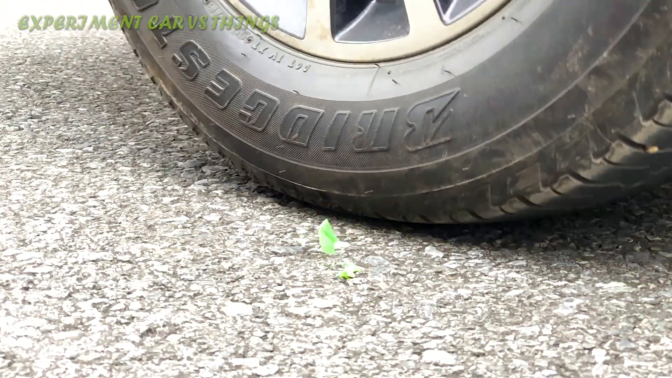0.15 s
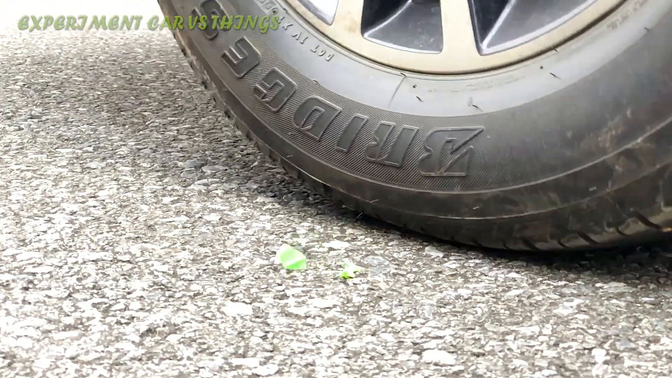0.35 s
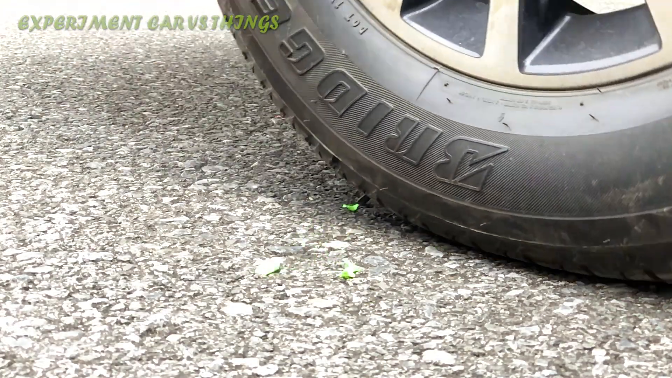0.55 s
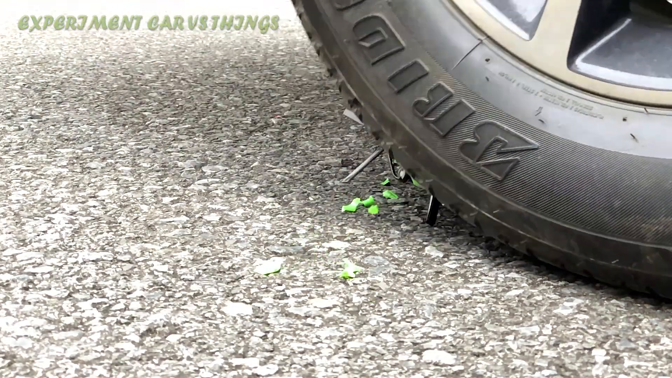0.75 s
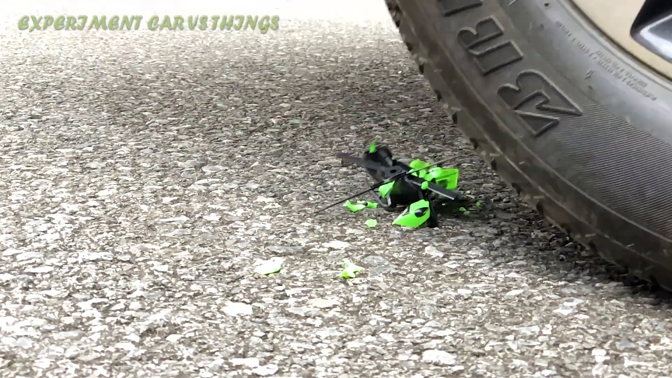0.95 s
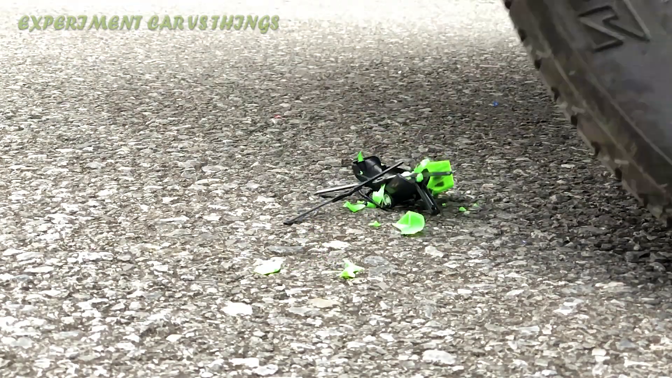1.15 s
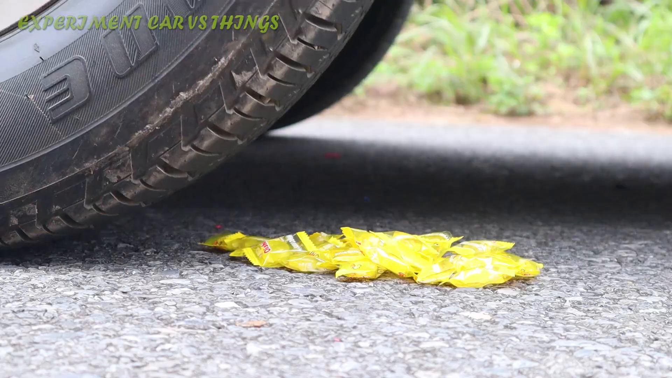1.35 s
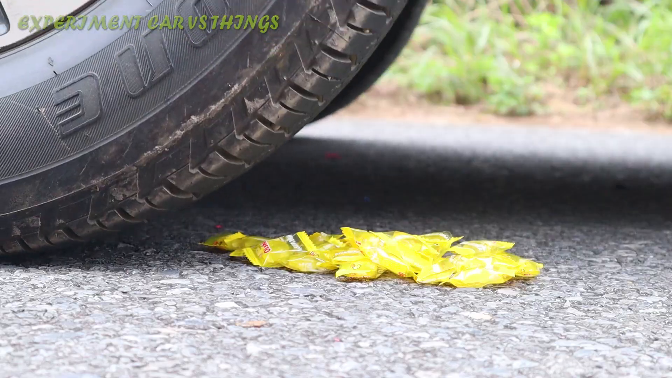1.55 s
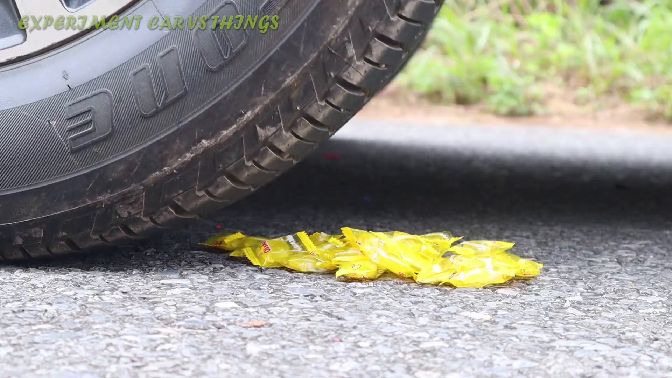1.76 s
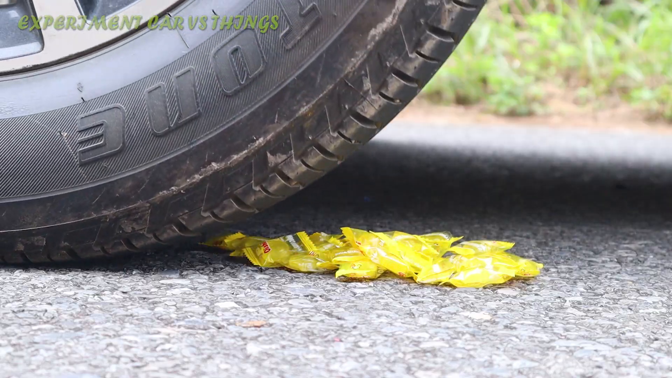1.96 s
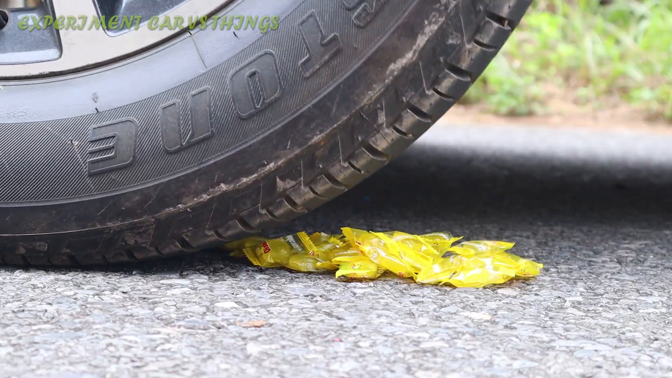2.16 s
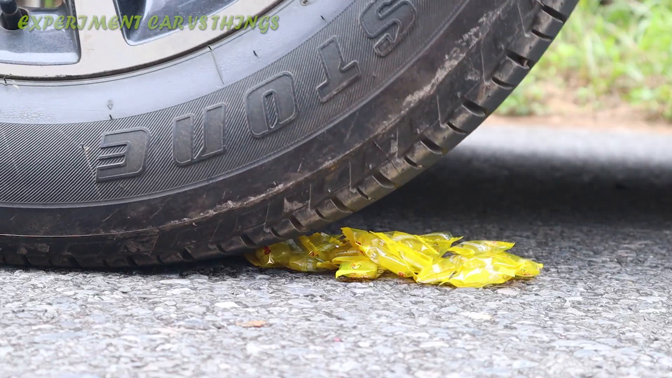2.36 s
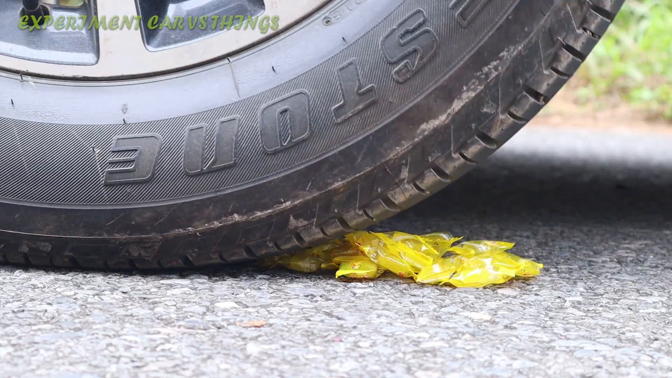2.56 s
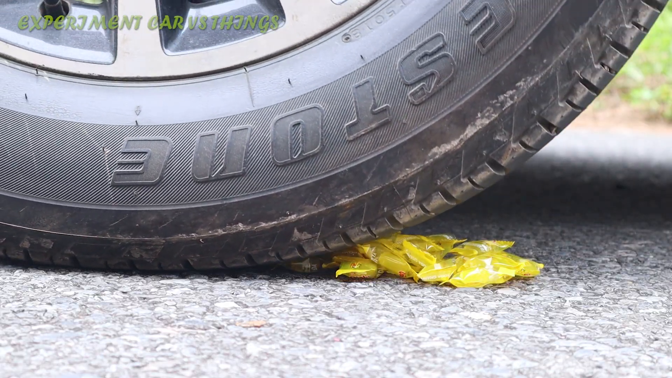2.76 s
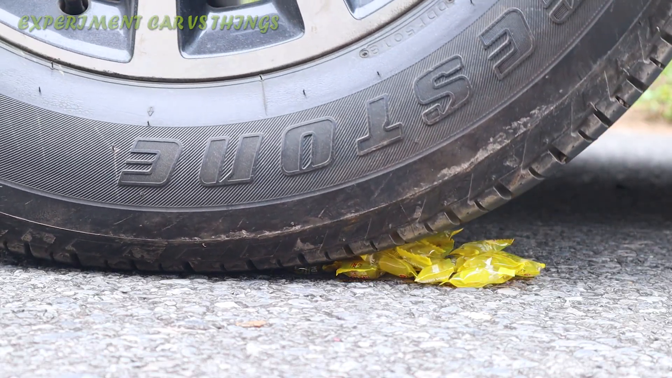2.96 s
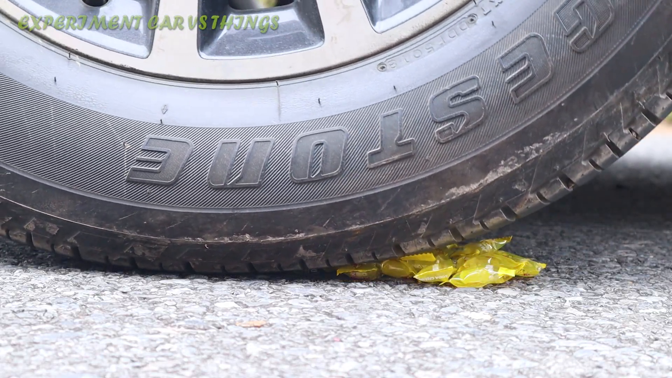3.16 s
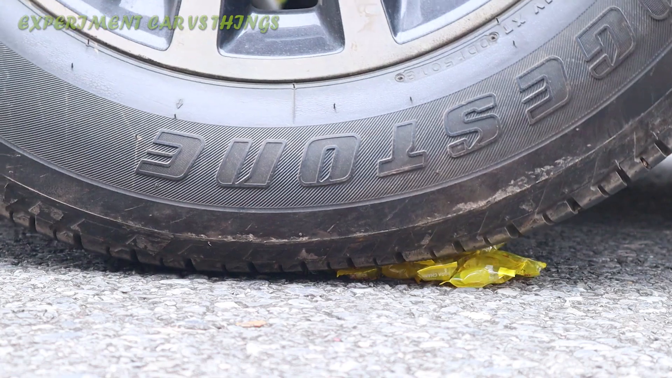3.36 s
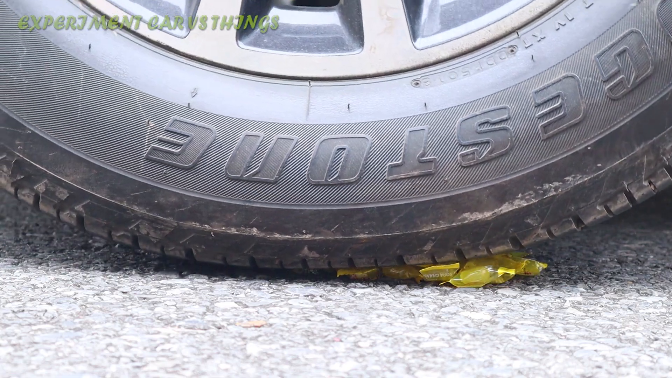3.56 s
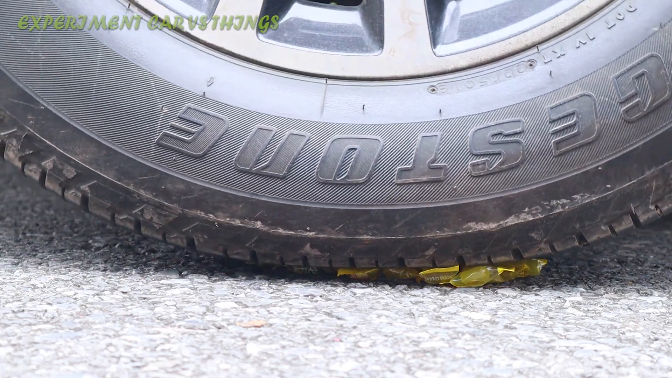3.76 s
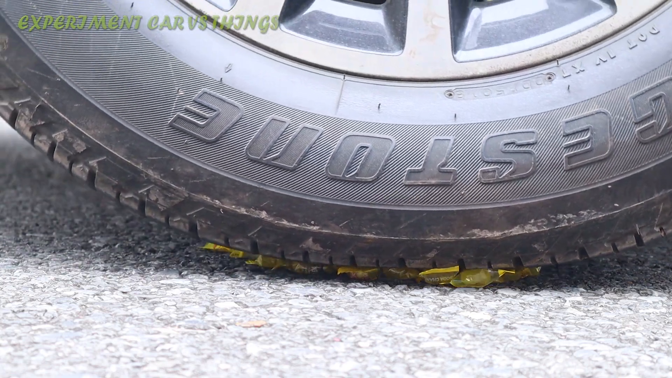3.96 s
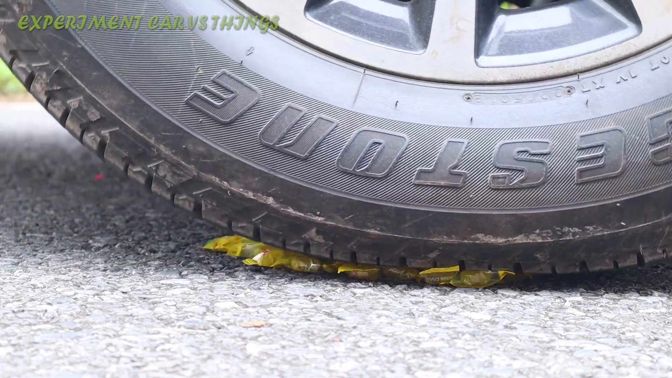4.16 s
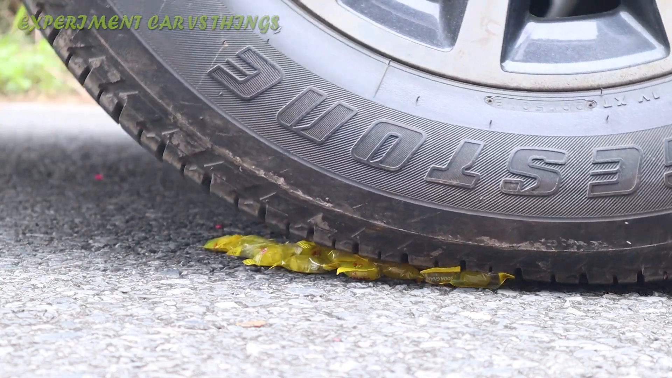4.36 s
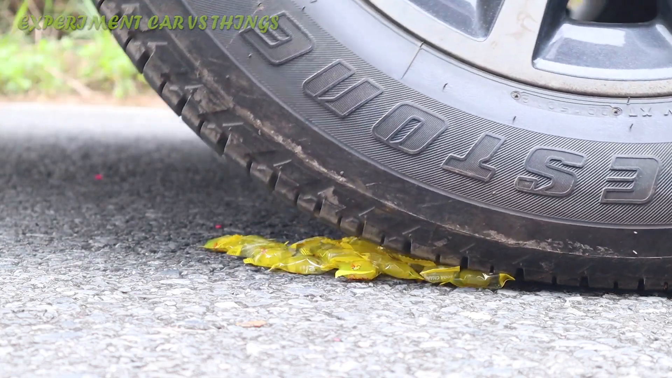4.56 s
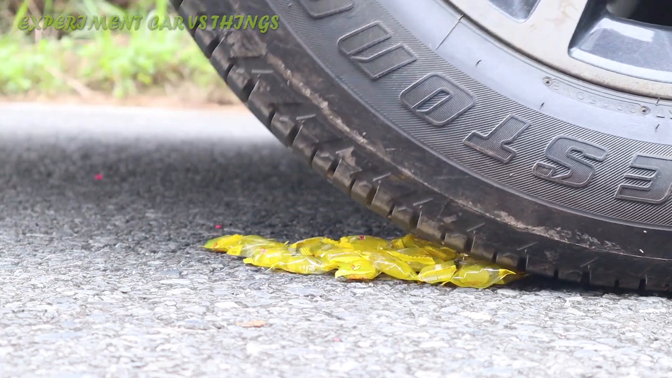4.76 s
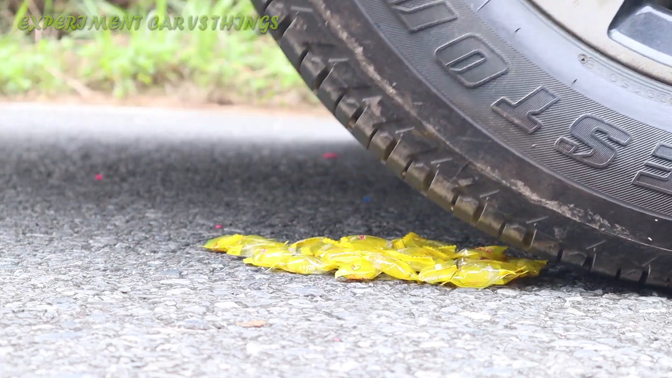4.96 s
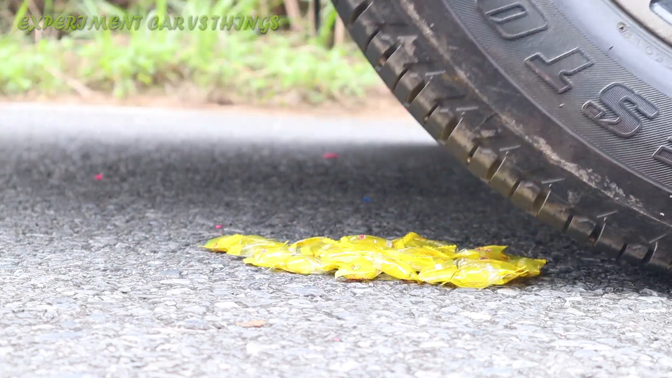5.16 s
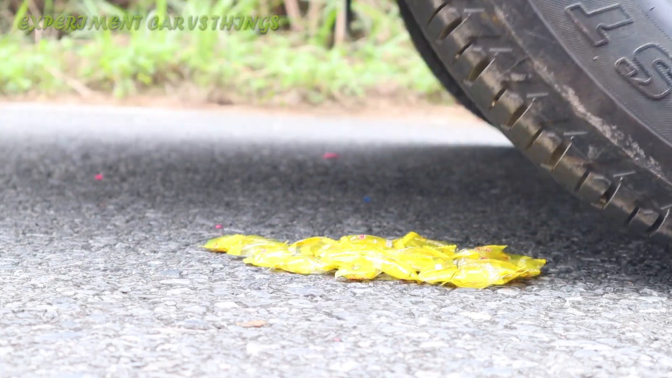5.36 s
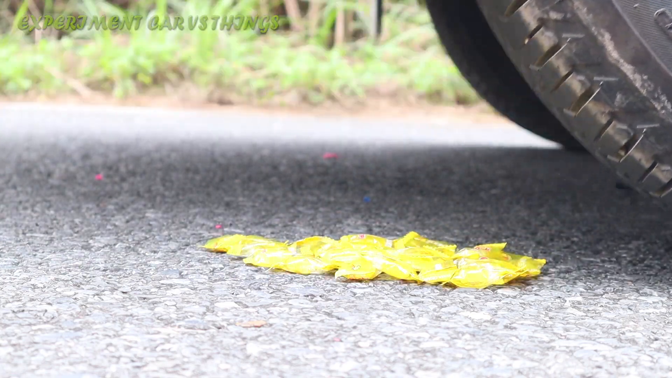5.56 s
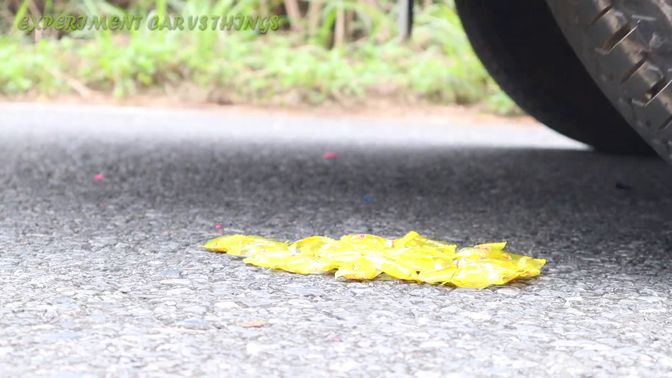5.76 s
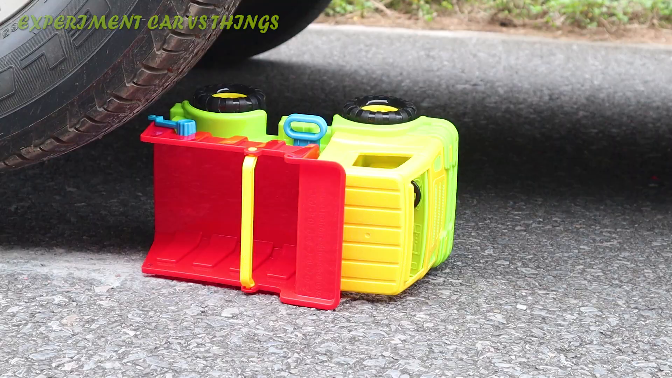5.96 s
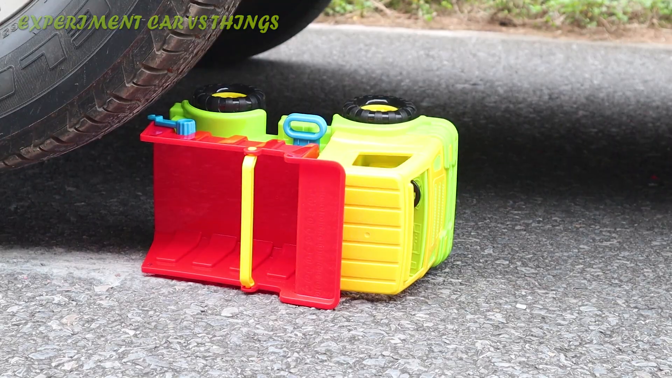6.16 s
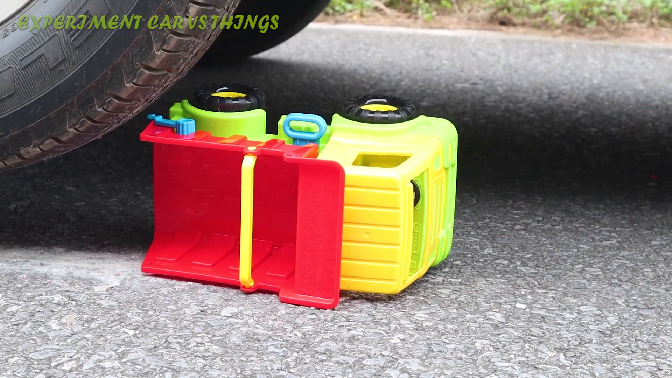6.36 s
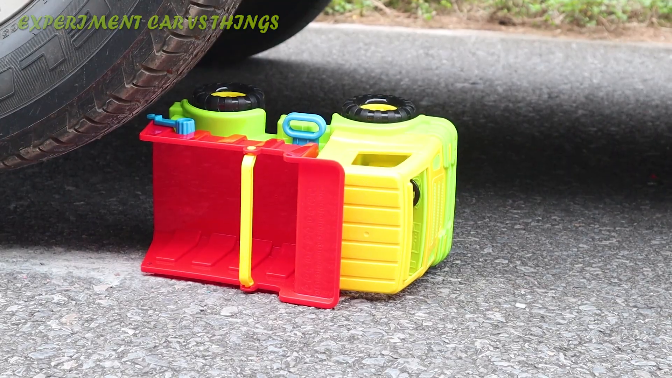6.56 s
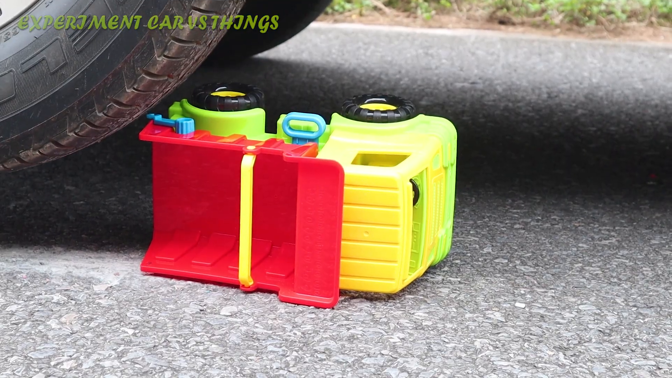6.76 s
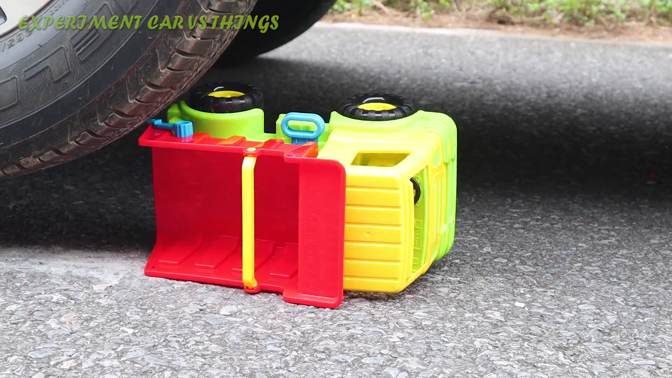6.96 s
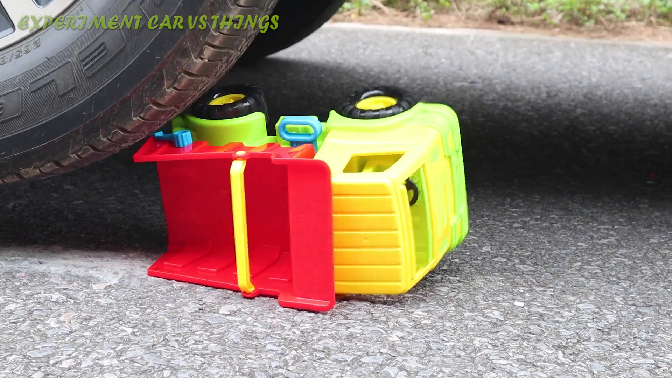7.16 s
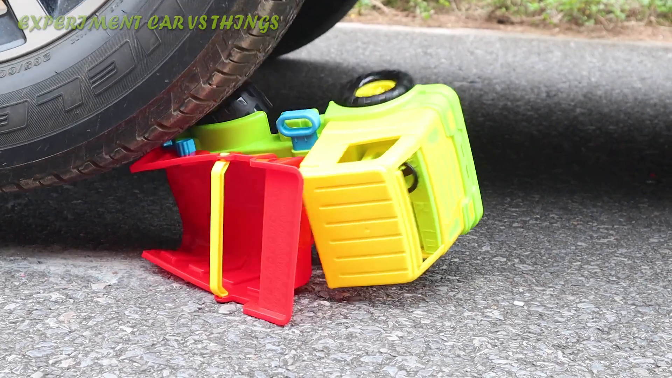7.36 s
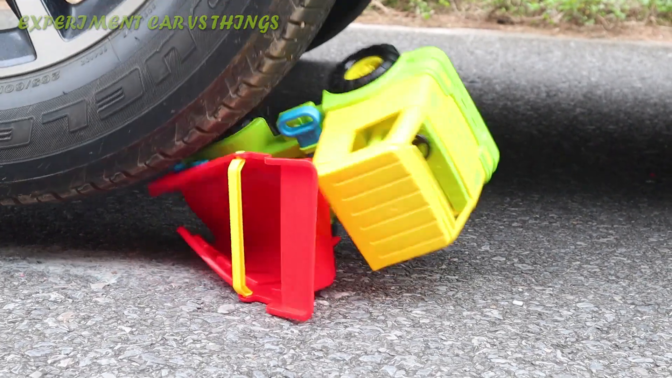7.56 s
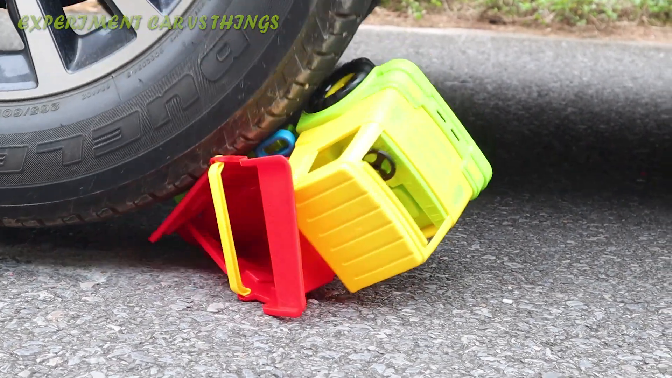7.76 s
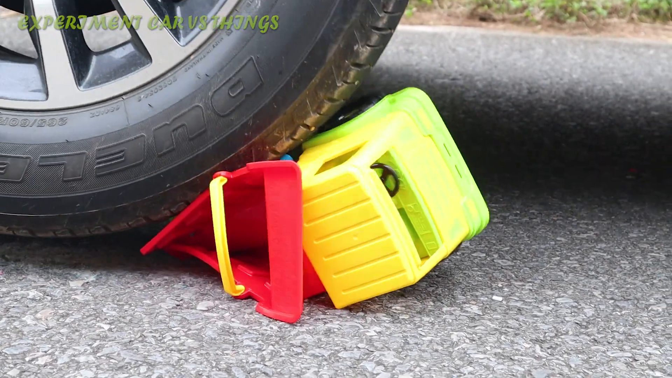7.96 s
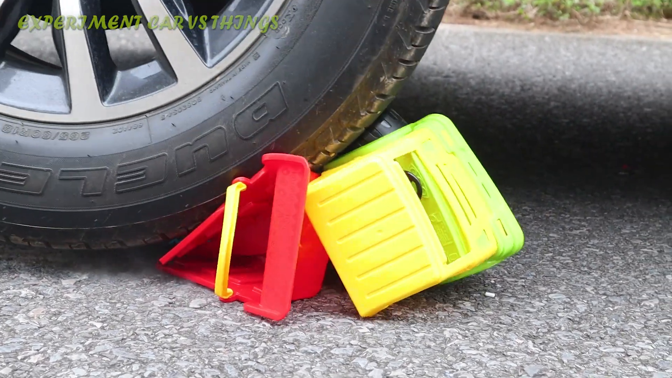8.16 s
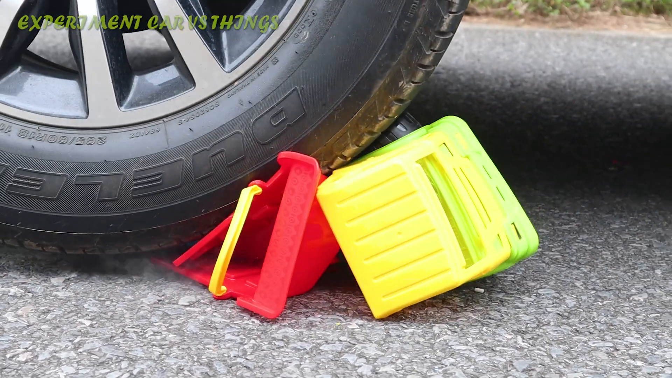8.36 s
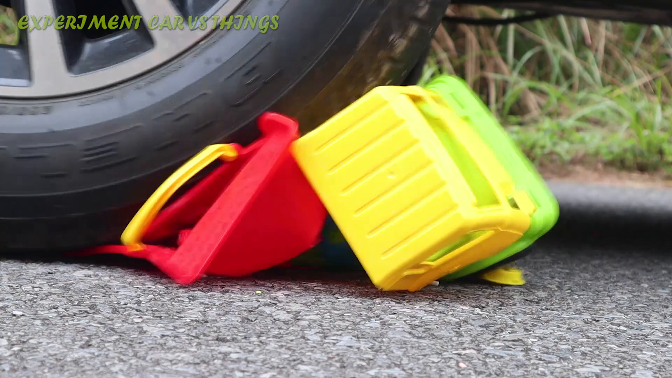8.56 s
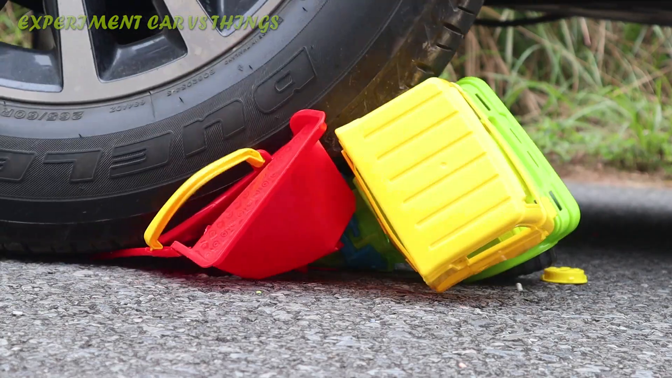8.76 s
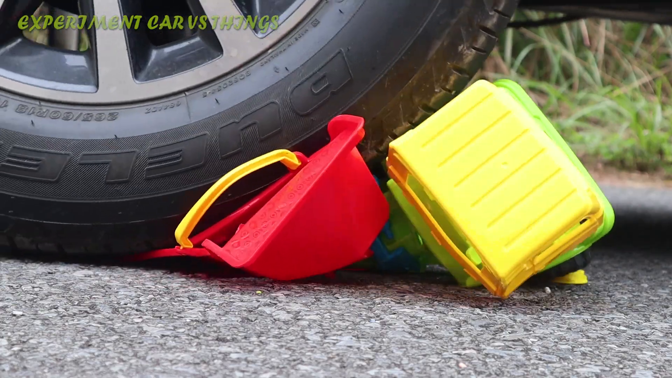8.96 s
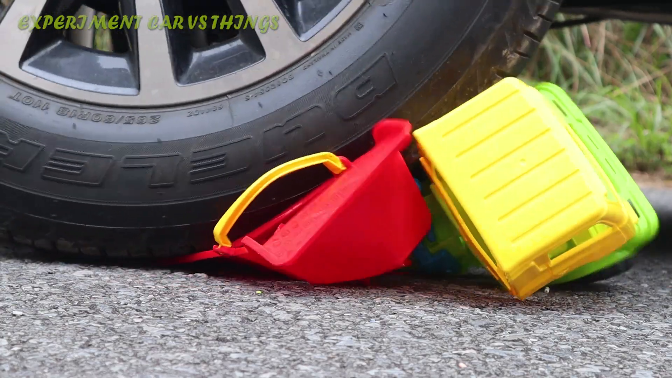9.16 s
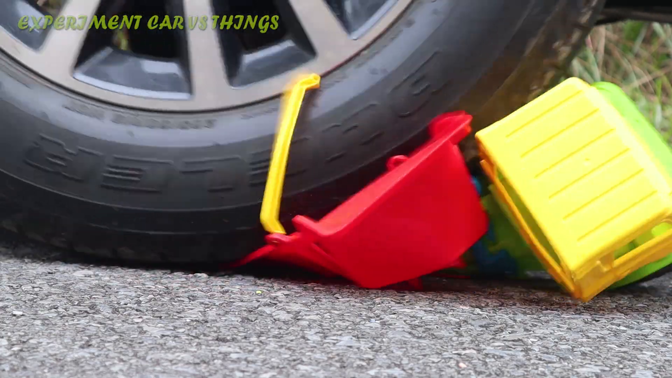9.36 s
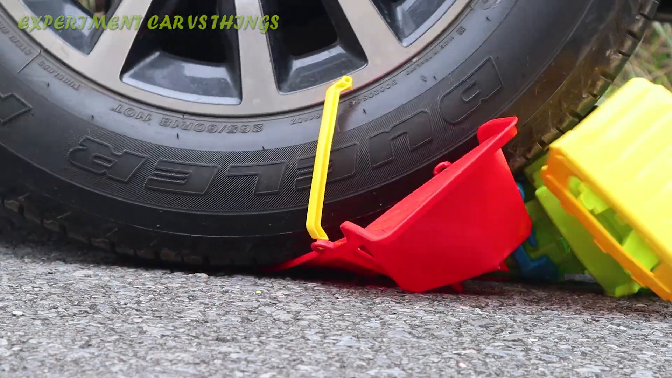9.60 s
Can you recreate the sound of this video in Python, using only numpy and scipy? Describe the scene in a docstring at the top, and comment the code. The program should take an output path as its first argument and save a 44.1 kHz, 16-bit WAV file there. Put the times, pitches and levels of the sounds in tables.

```python
"""Car tyre crushing toys and packets

On asphalt, close to the microphone, a tyre rolls slowly over three things, one after another.
A small brittle toy ticks and splinters: each fracture is a run of noise jumps ringing a shell.
A row of sealed plastic packets crinkles (clumped clicks), snaps and pops (damped swings) over engine idle.
Then the engine pulls with firing tones and tyre roar, and a hollow toy truck creaks, squeaks and
cracks apart through its wall resonances, overloading the microphone."""
import sys
import numpy as np
from scipy import signal
from scipy.fft import rfft, irfft, next_fast_len
from scipy.io import wavfile
from scipy.ndimage import uniform_filter1d

SR = 44100
rng = np.random.default_rng(int(sys.argv[2]) if len(sys.argv) > 2 else 0)


def output_pcm(signal):
    """Save a mono or channel-first signal as 16-bit PCM at the path in sys.argv[1].

    Samples are clipped to [-1, 1] before scaling.
    """
    pcm = np.clip(np.atleast_2d(signal).T, -1, 1) * 32767
    wavfile.write(sys.argv[1], SR, np.round(pcm).astype(np.int16))


N = 424683
TIME, LONG = np.arange(N) / SR, next_fast_len(N, True)
SIZE = 4096  # samples in one short hit
HZ, AGE = np.fft.rfftfreq(SIZE, 1 / SR), np.arange(SIZE) / SR
LONG_HZ = np.fft.rfftfreq(LONG, 1 / SR)


def amp(db):
    """Decibels to gain."""
    return 10 ** (np.asarray(db) / 20)


def unit(x):
    """Scales to rms 1."""
    return x / np.sqrt(np.mean(x ** 2) + 1e-20)


def smooth(x, *sizes):
    """Running means of these lengths in samples, one after another."""
    for size in sizes:
        x = uniform_filter1d(x, size=size)
    return x


def read(points, hz):
    """Reads a spectrum on a log-frequency axis."""
    f, value = np.transpose(points)
    return np.interp(np.log(hz + 1), np.log(f + 1), value)


def level(rows):
    """Gain along a dB curve, silent outside it."""
    s, db = np.transpose(rows)
    inside = (TIME >= s[0]) * (TIME <= s[-1])
    return amp(np.interp(TIME, s, db)) * inside


def envelope(start, end, rise_s, fall_s):
    """Swells up to start, holds until end, dies away."""
    before = np.maximum(start - TIME, 0) / rise_s
    after = np.maximum(TIME - end, 0) / fall_s
    return np.exp(-np.minimum(before + after, 20))


def add(mix, s, sound):
    """Mixes a sound in at a time."""
    first = max(round(s * SR), 0)
    part = mix[..., first:][..., :sound.shape[-1]]
    part += sound[..., :part.shape[-1]]


def tint(x, points):
    """Filters by a spectrum."""
    return irfft(rfft(x, LONG) * amp(read(points, LONG_HZ)), LONG)[..., :N]


def causal(gain):
    """Impulse response with this gain and the sharpest possible onset (minimum phase)."""
    log_gain = np.log(np.maximum(gain, 1e-5))
    circle = np.concatenate([log_gain, log_gain[-2:0:-1]])
    return np.fft.ifft(np.exp(np.conj(signal.hilbert(circle)))).real


def blow(x, db):
    """Sets the rms level of a hit's first 12 ms."""
    early = x[AGE < 0.012]
    return amp(db) * x / np.sqrt(np.mean(early ** 2) + 1e-20)


def peak(hz, width, db):
    """Gain of one resonance standing on a flat response."""
    return 1 + (amp(db) - 1) / (1 + (2 * (HZ - hz) / width) ** 2)


def wavelet(hz, cycles):
    """A short damped swing."""
    return np.sin(2 * np.pi * hz * AGE) * np.exp(-AGE * hz / cycles)


def spot(sound, lag_s=0.000022, pan_db=4.0):
    """Each break lies at its own place, so it reaches the two ports a little differently."""
    lag, pan = np.clip(rng.standard_normal(2), -2, 2)
    sides = np.array([[0.5], [-0.5]])
    delay_s = sides * lag * lag_s + 8 / SR  # the shared 8 samples keep both delays positive
    turn = np.exp(-2j * np.pi * HZ * delay_s)
    return irfft(rfft(sound) * turn, SIZE) * amp(sides * pan * pan_db)


def grains(shell, per_s, spread_db, clump_db, low_hz, high_hz, tone_db, count=16):
    """Clumps of tiny clicks of very unequal size, each ringing one patch of plastic."""
    out = np.zeros((2, N))
    for hz in np.geomspace(low_hz, high_hz, count):
        at = np.flatnonzero(rng.random(N) < per_s / count / SR)
        size = rng.exponential(1, SIZE)[at % SIZE]
        sign = rng.choice([-1, 1], SIZE)[at % SIZE]
        clicks = np.zeros(N)
        clicks[at] = sign * amp(spread_db * np.minimum(size, 3.5))
        patch = causal(shell * peak(hz, 0.3 * hz, tone_db))
        patch = spot(patch / np.linalg.norm(patch))[:, :SIZE // 4]
        out += signal.oaconvolve(clicks[None], patch, axes=1)[:, :N]
    clumps = unit(smooth(rng.standard_normal(N), 600, 300))
    out *= amp(clump_db * np.clip(clumps, -2, 2))
    # divide by the slow running loudness, so the grains keep an even level
    power = smooth(np.mean(out ** 2, axis=0), 5000, 3000)
    return out / np.sqrt(abs(power) + 1e-9)


def cracks(rows, shell, wall_db, ring_db, ring_s, peak_db, peak_width, vary_db, first=0.28, uneven_db=4.0):
    """A fracture runs in tiny jumps; the shell rings on, each time with slightly other resonances."""
    out = np.zeros((2, N))
    below = 1 / (1 + (HZ / 1400) ** 8)
    above = 1 / (1 + (4500 / (HZ + 1)) ** 8)
    middle = (1 - below) * (1 - above)
    for s, db, bright_db, hz, length in rows:
        jumps, sizes, ring = rng.standard_normal((3, 2, SIZE))  # rows of each: mid, side
        run = jumps * amp(uneven_db * np.clip(sizes, -2, 2)) * np.exp(-AGE / max(length, 1e-4))
        force = run / np.linalg.norm(run, axis=1, keepdims=True)
        force[0, 0] += first
        ring = ring * np.exp(-AGE / ring_s)
        force += amp(ring_db) * ring / np.linalg.norm(ring[0])
        shard = unit(smooth(rng.standard_normal(len(HZ)), 70, 40))
        gain = shell * peak(hz, peak_width * hz, peak_db) * amp(vary_db * shard)
        # body, walls, splinters: (band, lift over body dB, stereo width as side over mid)
        # the walls follow only a share of the brightness;
        # short waves leave the shell differently toward each port
        bands = [(below, 0, 0.11), (middle, wall_db + 0.64 * bright_db, 0.33), (above, bright_db, 0.6)]
        for band, lift_db, width in bands:
            response = causal(gain * band)
            mid, side = (blow(signal.fftconvolve(f, response)[:SIZE], db + lift_db) for f in force)
            add(out, s, np.array([mid + width * side, mid - width * side]))
    return out


def air(spectrum, width):
    """Steady noise, nearly mono in the bass and wider in the treble."""
    mid, side = rng.standard_normal((2, N))
    side = width * tint(side, [(60, -33), (500, -4.5), (2000, 5.5), (6000, 6.5)])
    return unit(tint(np.array([mid + side, mid - side]), spectrum))


# spectrum of the faint background at the microphone: pitch_hz, level_db (per Hz, relative)
BACKGROUND_COLOUR = [(15, -32), (25, 2), (69, 1), (115, 7), (196, -8), (404, -9), (856, -13.5), (3830, -18),
                     (10000, -29), (11200, -12), (12100, -31), (15000, -54.5)]


def background():
    """Faint steady noise lies under everything."""
    return amp(-71) * air(BACKGROUND_COLOUR, width=0.49)


# moments when the second and third crushing begin: start_s
CRUSH_STARTS = [1.356, 6.02]
# spectrum of the small toy's shell: pitch_hz, level_db (per Hz, relative)
SMALL_COLOUR = [(40, -13), (150, -6), (600, -10), (2000, -4), (6000, -4), (11000, -10), (12500, -37),
                (15500, -100)]


def debris(level_db=-76.5, swell_db=7):
    """Loose splinters of the small toy tick against the asphalt in fits until the packets' turn."""
    shell = amp(read(SMALL_COLOUR, HZ))
    ticks = grains(shell, per_s=140, spread_db=5, clump_db=2, low_hz=2000, high_hz=9000, tone_db=14, count=6)
    fits = unit(smooth(rng.standard_normal(N), 4000))
    swell = amp(level_db + swell_db * np.clip(fits, -2, 2))
    return swell * (TIME < CRUSH_STARTS[0]) * ticks


# dull knocks and pops under the tyre: the small toy's body, grit, then bursting packets;
# levels before the bass is thinned: start_s, swing_level_db, slap_level_db, swing_pitch_hz
KNOCKS_AND_POPS = [(0.033, -38.5, -41, 830), (1.6074, -31.5, -56, 550), (2.783, -10.5, -11.5, 750),
                   (2.826, -16, -19, 580), (2.9208, -23.5, -30, 900), (3.0163, -31, -42, 870),
                   (3.079, -16, -19, 680), (3.247, -23.5, -32, 780), (3.3566, -18, -17, 890),
                   (3.8153, -32.5, -17.5, 1430)]


def knocks_and_pops(swing_cycles=1.2, slap_hz=1800, slap_cycles=0.92, flap_db=-5, flap_s=0.0074):
    """Each knock or pop is a damped swing and a higher slap, both with a fluttering noise tail."""
    out = np.zeros(N)
    for s, swing_db, slap_db, swing_hz in KNOCKS_AND_POPS:
        flaps = rng.standard_normal(SIZE) * np.exp(-AGE / flap_s) * (1 - np.exp(-AGE / 0.001))
        this_slap_hz = slap_hz * rng.uniform(0.92, 1.08)
        for hz, cycles, db in [(swing_hz, swing_cycles, swing_db), (this_slap_hz, slap_cycles, slap_db)]:
            swing = wavelet(hz, cycles)
            tail = signal.fftconvolve(flaps, swing)[:SIZE]
            add(out, s, blow(unit(swing) + amp(flap_db) * unit(tail), db))
    return tint(out, [(60, -36.5), (200, -9.0), (450, -0.5)])


def cavity(pitch_hz=201, t60_s=0.7, level_db=-28.5):
    """The air inside the tyre hums, as a decaying sine, after each knock or pop."""
    out, age = np.zeros(N), TIME[:SR]
    for s, swing_db, *_ in KNOCKS_AND_POPS:
        fade = amp(swing_db + level_db - 60 * age / t60_s)
        add(out, s, fade * np.sin(2 * np.pi * pitch_hz * age))
    return out


# low thumps; at 8.17 s the overloaded microphone swinging back, then knocks on the phone:
# start_s, level_db (before decay), pitch_hz, decay_s
THUMPS = [(0.04, -39, 94.5, 0.017), (8.17, 5.5, 117, 0.0022), (8.1809, -5.5, 130, 0.0024),
          (8.1882, -1.5, 150, 0.0014), (8.785, -19.5, 60.4, 0.027)]


def thumps():
    """Each low thump is one damped swing, starting downward."""
    out = np.zeros(N)
    for s, db, hz, decay_s in THUMPS:
        add(out, s, -amp(db) * wavelet(hz, hz * decay_s))
    return out


# fractures of the small toy, and first a faint onset at 0.087 s played the same way, levels before the mix: #
# start_s, body_level_db, brightness_db (splinters over body), pitch_hz (strongest ring), length_s
SMALL_TOY_CRACKS = [(0.0868, -55, -2, 443, 0.031), (0.2049, -44.5, 2.5, 530, 0.0013),
                    (0.2256, -50.5, 1, 520, .018), (0.3061, -55, -15, 463, 0.0024),
                    (0.5348, -66, 1, 1090, .0024), (0.5973, -62, -1, 735, 0.00023),
                    (0.7794, -71.5, 23.5, 1230, 0.012), (0.8881, -64, -20, 700, 0.0071),
                    (0.9904, -67.5, 5, 1000, 0.0003), (1.0446, -74, 19.5, 1070, 0.0023),
                    (1.0704, -77.5, 27, 1250, 0.00054)]


def small_toy():
    """A brittle little shell fractures and rings on."""
    shell = amp(read(SMALL_COLOUR, HZ))
    return amp(-1.0) * cracks(SMALL_TOY_CRACKS, shell, wall_db=-1, ring_db=-9.5, ring_s=0.041,
                              peak_db=10.5, peak_width=0.21, vary_db=4.5)


# spectrum of the engine's rumble near the ground: pitch_hz, level_db (per Hz, relative)
IDLE_COLOUR = [(15, -25), (25, -5.5), (69, 0.5), (193, -7.5), (274, -11), (399, -10), (457, -15),
               (631, -13.5), (1020, -23), (1570, -24.5), (6550, -38.5), (8810, -47.5), (9810, -44.5),
               (12200, -50), (15500, -78)]
# spectrum of the tyre's roar on the asphalt: pitch_hz, level_db (per Hz, relative)
ROAR_COLOUR = [(53, -36), (90, -34), (124, -3), (199, -6), (241, -5.5), (332, -9), (539, -9.5), (849, -20),
               (941, -19.5), (1600, -30.5), (3000, -38), (3900, -43), (6600, -120)]
# the car pulls forward, levels before the lull: start_s, end_s, roar_level_db, rumble_level_db
PULLS = [(6.007, 6.144, -38.5, -51), (6.273, 6.676, -38.5, -51), (7.136, 7.8, -36, -45),
         (8.231, 8.335, -62, -25), (8.605, 9.19, -33, -34.5), (9.24, 9.618, -36.5, -35.5)]


def car(idle_db=-44, rise_s=0.031, fall_s=0.046):
    """The car idles from the packets on; each pull adds tyre roar and rumble."""
    roar, rumble = np.zeros(N), amp(idle_db) * (TIME > CRUSH_STARTS[0])
    for start, end, roar_db, rumble_db in PULLS:
        effort = envelope(start + rise_s, end, rise_s / 2, fall_s)
        roar = np.hypot(roar, amp(roar_db) * effort)
        rumble = np.hypot(rumble, amp(rumble_db) * effort)
    rolling = roar * (amp(-1.5) * air(ROAR_COLOUR, width=0.35) + drone())
    running = engine() + rumble * air(IDLE_COLOUR, width=1.0) + rolling
    # the car's sound drops away briefly around 8.48 s
    lull = amp(-46 / (1 + ((TIME - 8.48) / 0.093) ** 10))
    return lull * running


# how fast the packets crumple, first going under the tread, then peeling out of it:
# start_s, level_db (before the fold and crease gains)
CRINKLE_LEVEL = [(2.3, -59), (2.8, -37), (3.2, -32.5), (3.6, -39), (4.0, -39.5), (4.9, -38), (5.1, -41.5),
                 (5.3, -54), (5.95, -59.5)]
# a whole packet gives way, levels before the same gains: start_s, level_db
CRUNCHES = [(2.38, -40), (2.57, -35.5), (3.1, -31.5), (3.32, -34), (4.17, -37), (4.32, -41), (4.73, -30),
            (4.89, -32.5)]
# spectrum of the packets' plastic film: pitch_hz, level_db (per Hz, relative)
FILM_COLOUR = [(100, -18), (600, -11), (1100, -5), (1700, -7), (3300, -5), (6000, -7), (9000, -7),
               (11800, -6), (13500, -14), (15800, -33)]


def crinkle(folds_db=1.5, crease_db=-34, knee_db=-35, growth=1.33, loss_db_per_s=1.5, crunch_s=0.054):
    """The packets crumple under the tread: wide folds crackle, fine creases fizz."""
    film, fine = amp(read(FILM_COLOUR, HZ)), 1 / (1 + (6000 / (HZ + 1)) ** 3)
    folds = grains(film * (1 - fine), per_s=600, spread_db=3.5, clump_db=5,
                   low_hz=1595, high_hz=5180, tone_db=13.5)
    creases = grains(film * fine, per_s=1500, spread_db=5.5, clump_db=5.0,
                     low_hz=5100, high_hz=11500, tone_db=15.5)
    crunches = sum((amp(db) * envelope(s, s, crunch_s, crunch_s)) ** 2 for s, db in CRUNCHES)
    work = np.sqrt(level(CRINKLE_LEVEL) ** 2 + crunches)
    # flattened film fizzes less
    stiffness = amp(-loss_db_per_s * np.maximum(TIME - CRINKLE_LEVEL[0][0], 0))
    # fine creases grow faster than wide folds
    crease_work = stiffness * amp(crease_db) * (work / amp(knee_db)) ** growth
    return amp(folds_db) * work * folds + crease_work * creases


# film buckling, peak levels before gain and panning: start_s, level_db, pitch_hz
SNAPS = [(2.3716, -4.5, 3570), (2.4646, -11.5, 2150), (2.5289, -6, 2500), (2.6083, -3.5, 5100),
         (2.6437, -5, 3560), (2.6564, -3, 2430), (2.7286, -6, 4570), (2.8248, 5.5, 3500),
         (2.962, -6.5, 4470), (3.1462, -5, 3200), (3.3211, 1, 4700), (3.341, -9, 4100), (3.3984, 3.5, 3370),
         (3.409, -5.5, 6700), (3.4731, -1.5, 2400), (3.8262, 2, 4600), (3.9533, -0.5, 4970),
         (4.0018, -6.5, 2970), (4.288, -1, 3800), (4.3245, -5.5, 3900), (4.3652, -3.5, 6700),
         (4.4526, -1.5, 5060), (4.485, 1, 4320), (4.515, -5.5, 4350), (4.5242, -4, 4660),
         (4.5876, 0.5, 6750), (4.8591, -3, 3970), (4.917, -10, 3500), (4.951, -5.5, 2950),
         (5.0173, -6, 7500), (5.069, -6.5, 5100), (5.1778, -2, 5460), (5.2818, -13.5, 3800),
         (5.3253, -20, 2290), (5.4083, -16.5, 2750), (5.6002, -18, 3940), (5.7047, -24.5, 3900),
         (5.7757, -21.5, 2000), (5.791, -14, 5000), (5.9893, -14.5, 2800)]


def snaps(width=0.68, flutter_db=-3, flutter_s=0.001, gain_db=-1):
    """Stiff film flips over in a quick stutter; the size of the fold sets its pitch."""
    out, film = np.zeros((2, N)), amp(read(FILM_COLOUR, HZ))
    for s, db, hz in SNAPS:
        force = rng.standard_normal(SIZE) * np.exp(-AGE / flutter_s)
        force *= amp(flutter_db) / np.linalg.norm(force)
        force[0] += 1
        fold = film / np.sqrt(1 + (np.log((HZ + 1) / hz) / (width / 2)) ** 2)
        snap = signal.fftconvolve(force, causal(fold))[:SIZE]
        add(out, s, spot(amp(db + gain_db) * snap / abs(snap).max()))
    return out


# resonances of the loaded tyre: pitch_hz, width_hz, level_db (relative)
TREAD_MODES = [(223, 62, -0.77), (566, 97, -0.23)]


def drone(level_db=-6):
    """Rough asphalt shakes the tyre's resonances; the level is set against the roar."""
    gain = sum(amp(db) / (1 + (2 * (LONG_HZ - hz) / width) ** 2) for hz, width, db in TREAD_MODES)
    shaken = irfft(rfft(rng.standard_normal(LONG)) * gain, LONG)[:N]
    return amp(level_db) * unit(shaken)


# the engine labours, levels before throb and lull:
# start_s (moment of greatest effort), swell_s, pitch_hz (mean firing rate), level_db
SURGES = [(6.67, 0.076, 60.25, -29), (9.05, 0.21, 56.3, -32)]
# tones of the firing: multiple of the firing rate, level_db (relative)
FIRING_ORDERS = [(1, 2), (2, -1.5), (3, -8.5), (4, -8.5)]


def engine(waver=0.0078, throb=0.43):
    """Firing tones swell and fade with each surge of effort."""
    drift, lumps = (unit(smooth(row, 1500)) for row in rng.standard_normal((2, N)))
    out = np.zeros(N)
    for s, swell_s, hz, db in SURGES:
        turns = np.cumsum(hz * (1 + waver * drift)) / SR
        firing = sum(amp(gain) * np.sin(2 * np.pi * (k * turns + rng.random())) for k, gain in FIRING_ORDERS)
        out += amp(db) * envelope(s, s, swell_s, swell_s) * unit(firing)
    return out * (1 + throb * lumps)


# spectrum of the truck's plastic: pitch_hz, level_db (per Hz, relative)
TRUCK_COLOUR = [(40, -25), (150, -13), (350, -9), (800, -6), (1400, -3.5), (3000, -7.5), (5000, -15.5),
                (9000, -20.5), (12000, -23.5), (15500, -40)]
# resonances of the truck's walls: pitch_hz, width_hz, level_db (over the flat response)
WALL_MODES = [(239, 19, 6.5), (615, 1000, 2.5), (1100, 93, -1.5), (1580, 240, 0.5), (2120, 300, 1),
              (3060, 360, 0.5), (4320, 710, 5), (7300, 1600, 2), (11300, 1800, 4.5)]


def walls():
    """Response of the hollow truck: its plastic's spectrum times its wall resonances."""
    return amp(read(TRUCK_COLOUR, HZ)) * np.prod([peak(*mode) for mode in WALL_MODES], axis=0)


# strain on the truck: start_s, level_db
CREAK_LEVEL = [(7.0, -55), (7.25, -39.5), (7.5, -30), (7.72, -27), (8.05, -44), (8.35, -32), (8.47, -53),
               (8.72, -40), (9.62, -47.5)]


def creak(settle_db=-16, settle_rise_s=0.0058, settle_s=0.021):
    """The truck strains and scrapes over the grit, and its pieces scrape on after each crack."""
    dull = walls() / np.hypot(1, HZ / 9000)  # scraping is duller than breaking
    scrape = grains(dull, per_s=900, spread_db=1.0, clump_db=5.5, low_hz=295, high_hz=2480, tone_db=10)
    settling = sum((amp(db + settle_db) * envelope(s, s, settle_rise_s, settle_s)) ** 2
                   for s, db, *_ in TRUCK_CRACKS)
    return np.sqrt(level(CREAK_LEVEL) ** 2 + settling) * scrape


# fractures of the truck, levels before the mix:
# start_s, body_level_db, brightness_db (splinters over body), pitch_hz (strongest ring), length_s
TRUCK_CRACKS = [(7.0855, -29.5, -18, 1090, 0.0019), (7.296, -20.5, -32, 300, 0.066),
                (7.3099, -16, -22.5, 1060, 0.014), (7.3281, -18, -20, 1080, 0.012),
                (7.381, -17.5, -26, 880, 0.0049), (7.4026, -26.5, -23, 840, .005),
                (7.4379, -21, 1.5, 2400, 0.0013), (7.4524, -19.5, 0, 2150, 0.01),
                (7.5395, -26, -26, 915, 0.006), (7.5825, -15.5, -5, 1010, 0.0036),
                (7.6042, -11, -10, 950, 0.0031), (7.6281, -21.5, -10.5, 620, 0.014),
                (7.66, -17, -8.5, 960, 0.027), (7.7184, -20, -12, 1070, 0.014),
                (7.7778, -11, -23.5, 1050, 0.011), (7.7897, -14.5, -19, 1060, 0.001),
                (7.849, -17.5, -1, 680, 0.0023), (7.852, -16, -15, 1070, 0.0044),
                (7.889, -21, -19, 675, .0056), (7.9585, -27, -35, 890, 0.0013),
                (7.9822, -23.5, -46, 453, 0.0036), (7.9937, -22, -28, 640, .0036),
                (8.0148, -20.5, 2, 2870, .0011), (8.085, -13.5, -24.5, 775, 0.0074),
                (8.167, -15.5, -6, 880, 0.0019), (8.2779, -23.5, -21, 630, .013),
                (8.304, -18.5, -2.5, 836, 0.0009), (8.328, -22, -19, 1070, .006),
                (8.3449, -24, -17, 930, 0.0088), (8.4295, -32, -17, 970, 0.0035),
                (8.4947, -32, 1, 1217, 0.0023), (8.5077, -24, 5, 1100, 0.0026),
                (8.5231, -23.5, -6.5, 1105, 0.0091), (8.6297, -12.5, -13.5, 1060, .005),
                (8.6649, -10.5, -18.5, 432, 0.0049), (8.6816, -15.5, -4, 920, 0.0032),
                (8.699, -17.5, -38, 1250, .004), (8.8913, -14, -47, 760, .003),
                (8.9223, -17, -25, 286, 0.0041), (8.937, -5, -21.5, 664, 0.0033),
                (8.9506, -18, -15, 695, 0.019), (9.0382, -31.5, -26, 1220, 0.0016),
                (9.108, -12, -18.5, 610, 0.0056), (9.118, -15, -13, 1180, 0.02),
                (9.1288, -12, -23, 510, 0.017), (9.2929, -14.5, -7, 1330, 0.0012),
                (9.3064, -14.5, -17, 370, 0.012), (9.324, -15.5, -6, 2000, 0.0067),
                (9.4019, -12, -13.5, 700, 0.00078), (9.4062, -16.5, -10, 1100, 0.0024),
                (9.417, -21.5, -4.5, 670, 0.0021), (9.4573, -17, -4.5, 3600, 0.0017),
                (9.4783, -14, -11.5, 2280, .0045), (9.61, -37.5, -1, 310, 0.0017)]


def truck():
    """The hollow truck cracks apart, its walls ringing briefly."""
    return amp(0.5) * cracks(TRUCK_CRACKS, walls(), wall_db=4.5, ring_db=-9.5, ring_s=0.012,
                             peak_db=11, peak_width=0.25, vary_db=4.0)


# rubber slipping on the truck, peak levels before gain: start_s, level_db
SQUEAKS = [(8.748, -29), (8.782, -22.5), (8.809, -27), (8.823, -24), (8.846, -18.5), (8.856, -19.5),
           (8.873, -23), (8.882, -26), (9.22, -35), (9.252, -26), (9.258, -22.5), (9.267, -22),
           (9.389, -29)]


def squeaks(pitch_hz=2890, rise_s=0.00095, jitter=0.087, gain_db=1.5, chatter_db=-15, chatter_s=0.019):
    """Each slip is a brief, rough chirp; the rubber chatters on faintly after it."""
    out = np.zeros(N)
    chirp = AGE / rise_s * np.exp(1 - AGE / rise_s)
    shape = chirp + amp(chatter_db) * np.exp(-AGE / chatter_s)
    for s, db in SQUEAKS:
        wobble = unit(smooth(rng.standard_normal(SIZE), 20))
        pitch = pitch_hz * (1 + jitter * wobble)
        add(out, s, amp(db + gain_db) * shape * np.sin(2 * np.pi * np.cumsum(pitch) / SR))
    return out


# reflections between road, tyre and underbody: pitch_hz, t60_s
UNDERBODY = [(150, 0.15), (600, 0.17), (1500, 0.14), (4000, .1), (12000, 0.07)]


def place(x, wet_db, lead_s, apart):
    """Direct sound reaches the right port first; reflections under the car follow."""
    noise = rng.standard_normal((2, 2 * SIZE))
    hz, t, z = signal.stft(noise, SR, nperseg=128)
    z[1] *= (apart * hz / (hz + 1500))[:, None]  # the side signal widens with pitch
    decay = amp(-60 * t / read(UNDERBODY, hz)[:, None])
    mid, side = signal.istft(z * decay, SR, nperseg=128)[1]
    build_up = 1 - np.exp(-np.arange(len(mid)) / SR / 0.0029)
    tail = np.array([mid + side, mid - side]) * build_up
    wet = signal.oaconvolve(x, tail / np.linalg.norm(tail[0]), axes=1)[:, :N]
    late = irfft(rfft(x[0], LONG) * np.exp(-2j * np.pi * LONG_HZ * lead_s), LONG)[:N]
    return np.array([late, x[1]]) + amp(wet_db) * wet


# balance of the microphone's two ports: pitch_hz, level_db (left minus right)
BALANCE = [(400, 4), (1300, -1.6), (2400, -5), (4400, 0.5), (12000, 0)]


def scene():
    """The three crushes over the sound of the car."""
    toys = place(small_toy() + debris(), wet_db=-12.0, lead_s=0.00001, apart=0.16)
    toys += place(crinkle() + snaps() + knocks_and_pops(), wet_db=-12, lead_s=0.000025, apart=0.93)
    toys += place(truck() + creak() + squeaks(), wet_db=-15.5, lead_s=0.00002, apart=2.16)
    left = tint(toys[0], [(hz, db / 2) for hz, db in BALANCE])
    right = tint(toys[1], [(hz, -db / 2) for hz, db in BALANCE])
    return np.array([left, right]) + thumps() + cavity() + car() + background()


def record(dry):
    """The loudest cracks clip at the microphone; then a low-pass at 15800 Hz limits the band."""
    clipped = np.clip(dry, -1, 1)
    low_pass = signal.firwin(255, 15800, window=("kaiser", 8), fs=SR)
    return signal.oaconvolve(clipped, low_pass[None], "same")


dry = scene()
out = record(dry)
output_pcm(out)
```